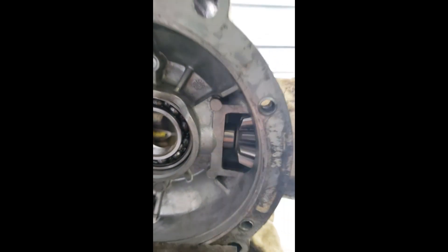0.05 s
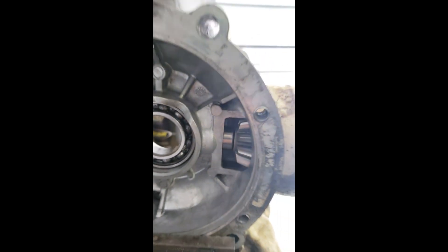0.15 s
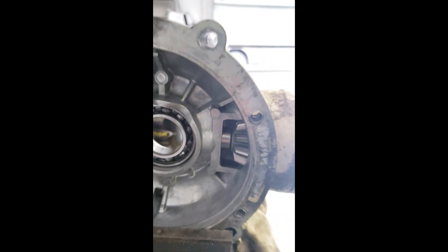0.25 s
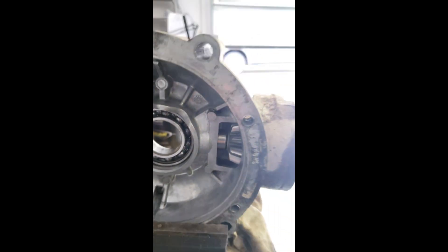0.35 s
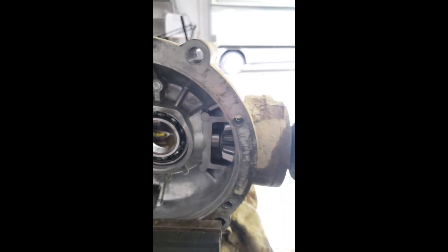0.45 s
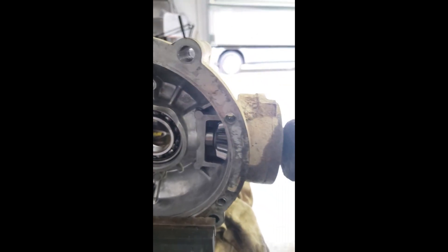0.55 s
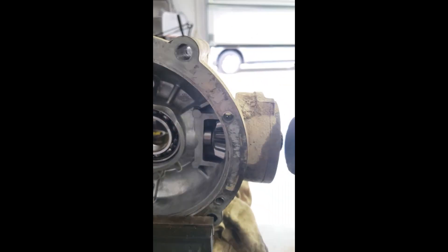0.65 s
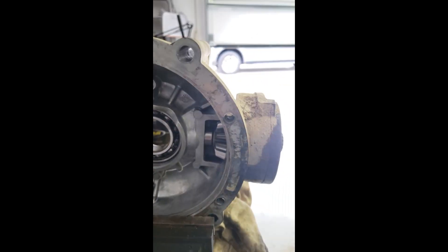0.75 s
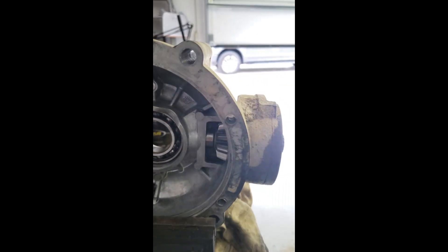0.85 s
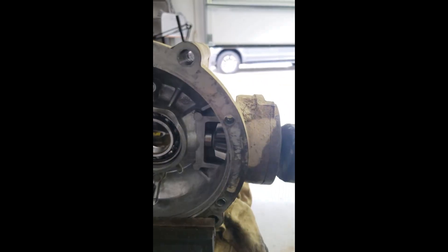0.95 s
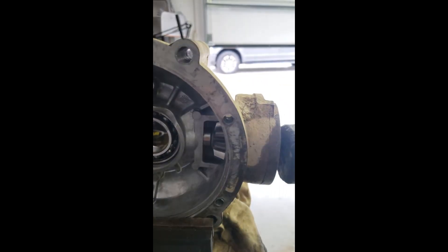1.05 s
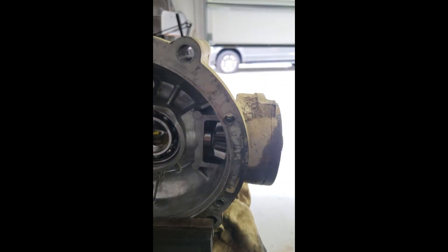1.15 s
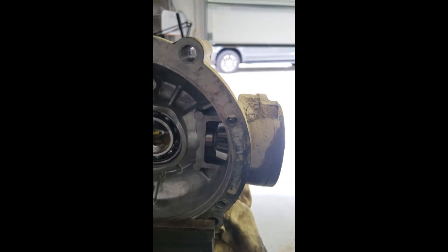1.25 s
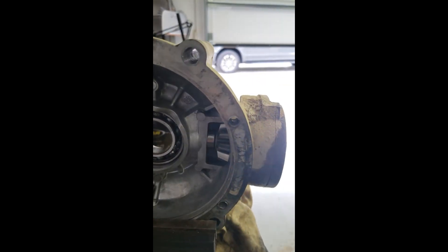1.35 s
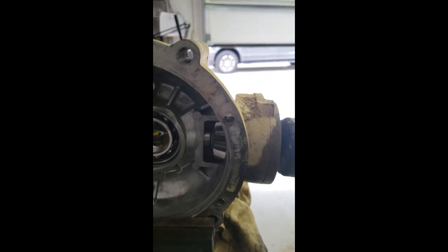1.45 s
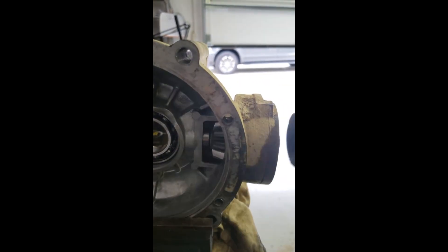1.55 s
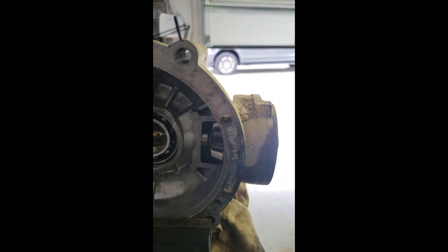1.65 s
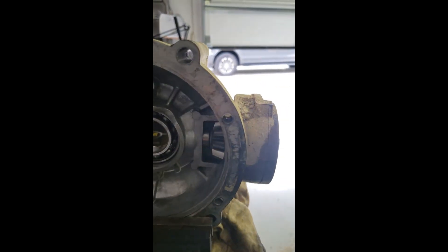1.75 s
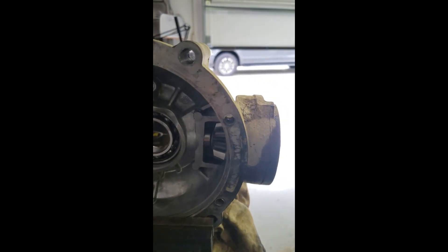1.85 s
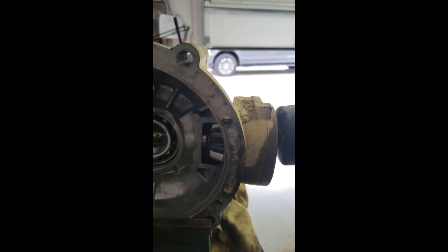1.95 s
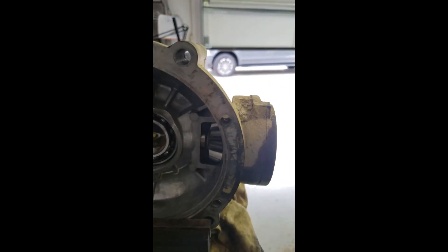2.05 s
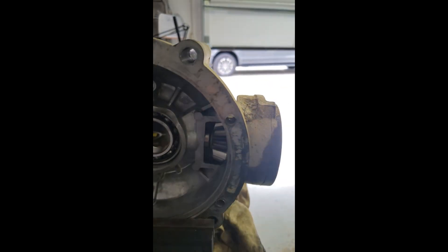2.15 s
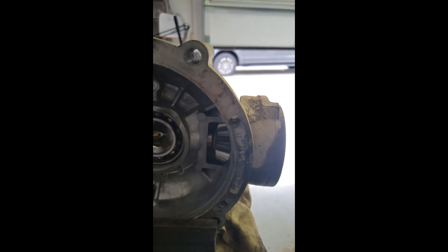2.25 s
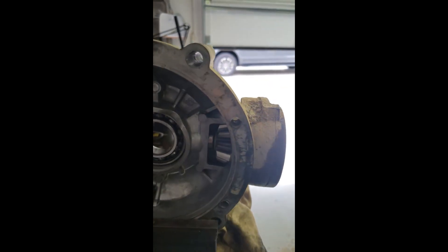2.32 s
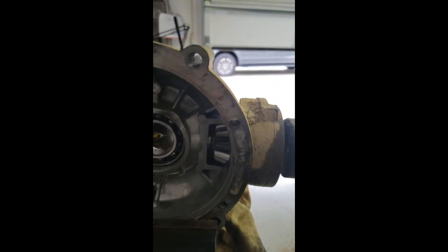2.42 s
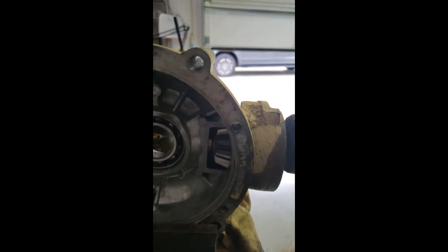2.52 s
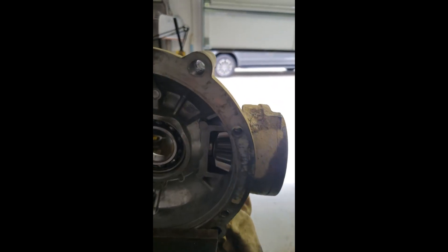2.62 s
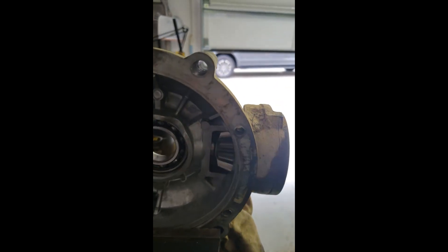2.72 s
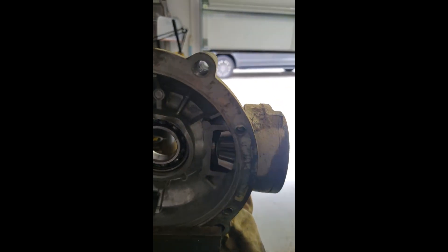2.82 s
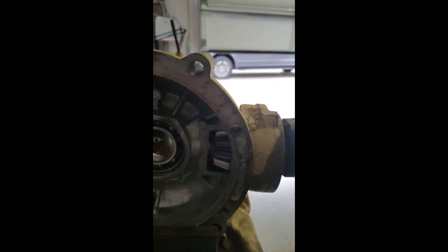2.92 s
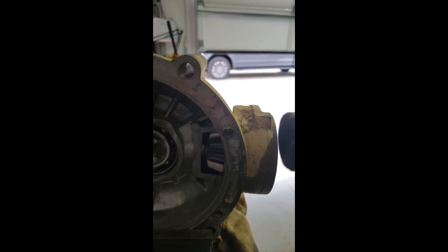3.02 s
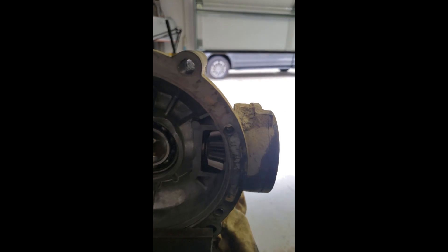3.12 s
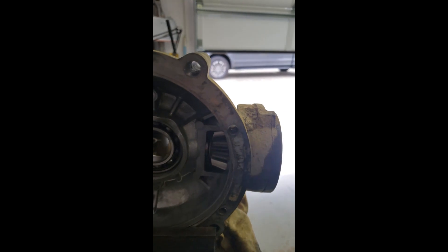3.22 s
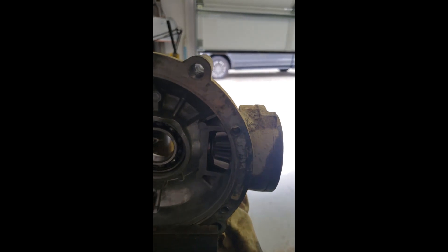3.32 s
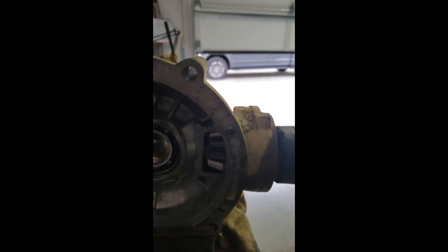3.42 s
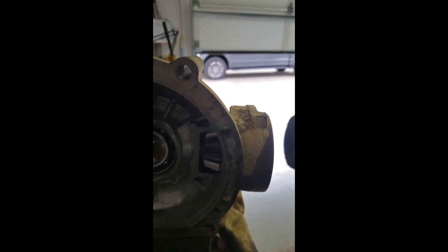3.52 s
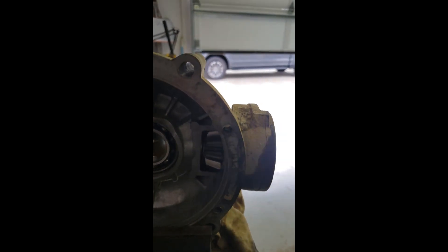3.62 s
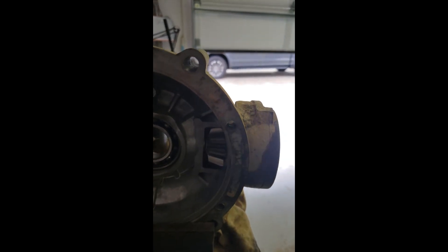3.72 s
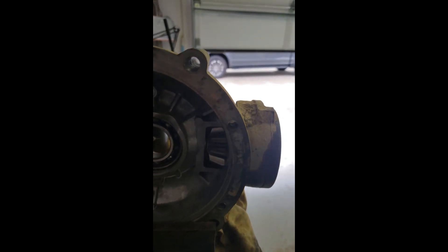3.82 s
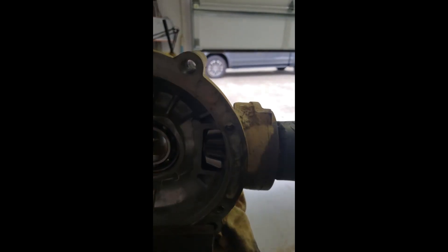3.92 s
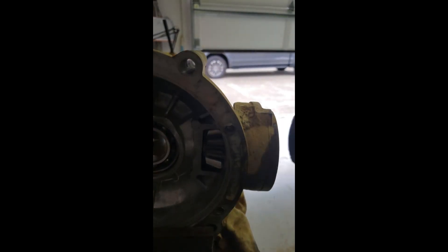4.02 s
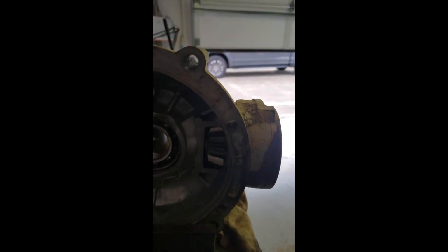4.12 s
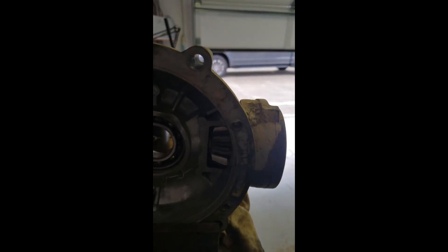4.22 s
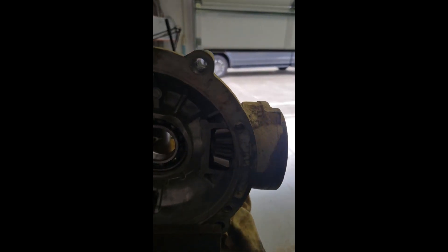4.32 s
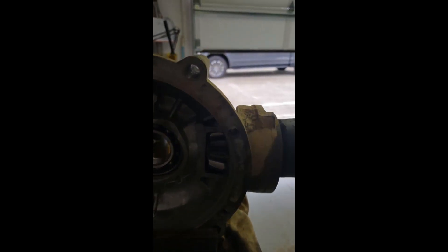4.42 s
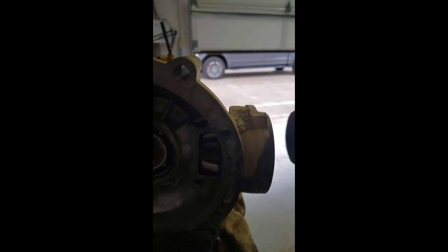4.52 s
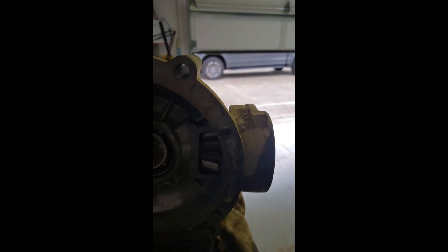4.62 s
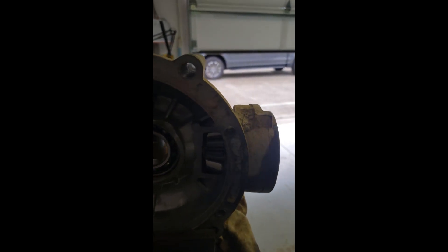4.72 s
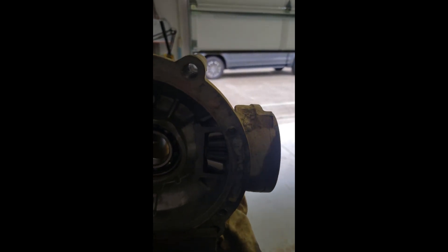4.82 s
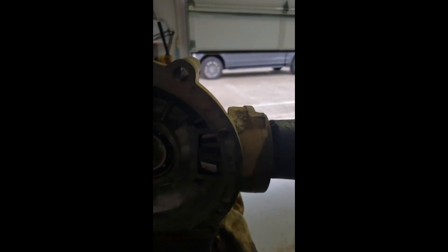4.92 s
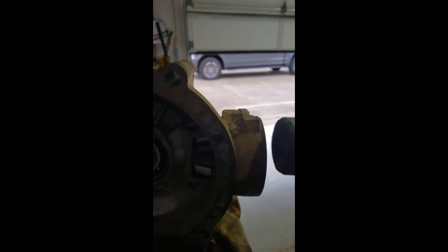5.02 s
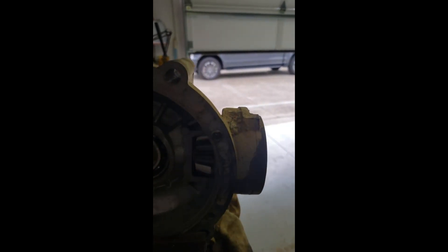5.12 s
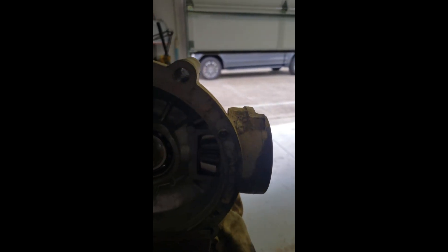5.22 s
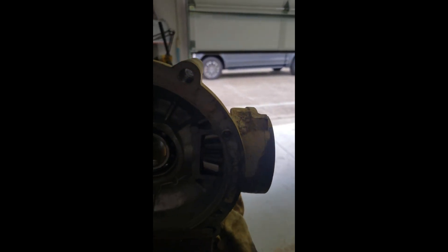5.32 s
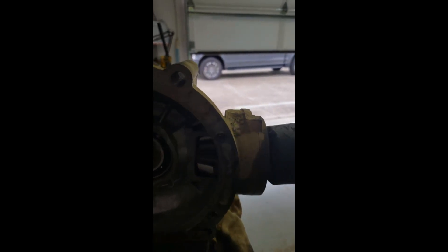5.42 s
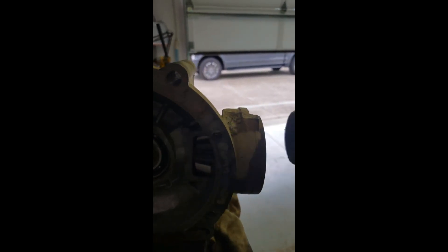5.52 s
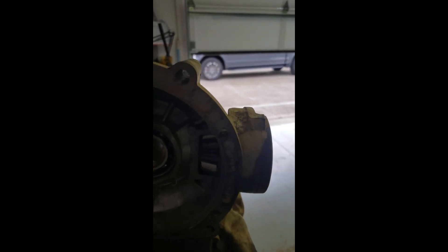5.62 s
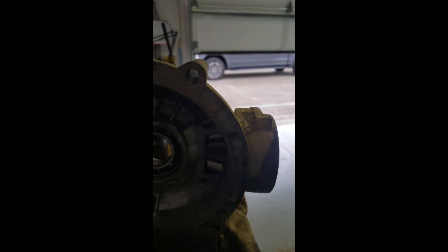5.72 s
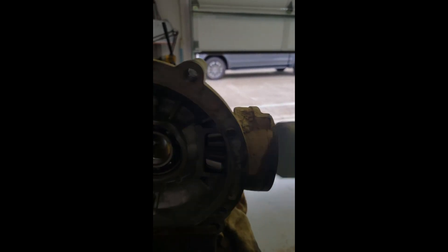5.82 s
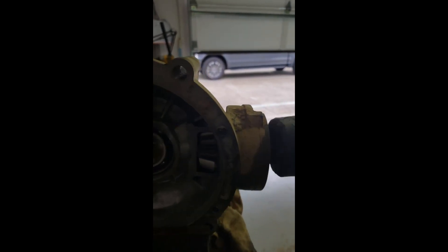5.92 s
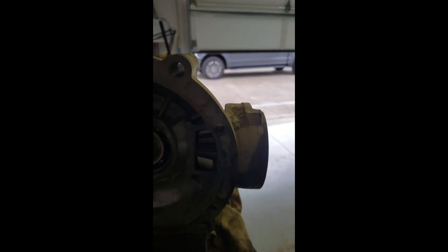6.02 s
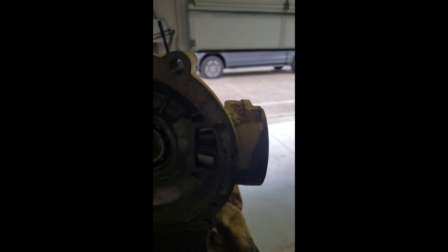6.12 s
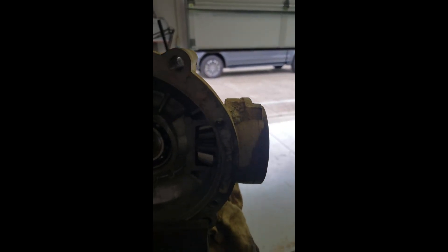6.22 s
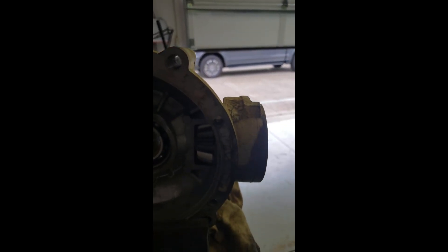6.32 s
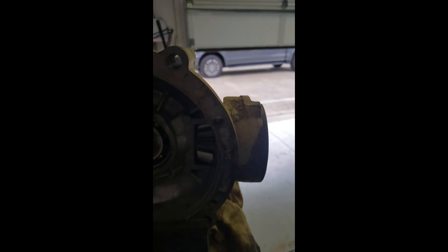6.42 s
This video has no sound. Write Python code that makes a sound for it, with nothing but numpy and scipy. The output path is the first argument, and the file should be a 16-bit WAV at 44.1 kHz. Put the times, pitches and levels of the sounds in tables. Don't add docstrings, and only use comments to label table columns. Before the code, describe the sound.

From 0 s a rubber mallet knocks a steel gear into a cast housing at arm's length, the first hit right at the start, then about every half second until 5.9 s, thirteen blows in all. Each has a blunt low thud, an instant hard steel clack around 2-5 kHz, a damped ring under a tenth of a second, and a little treble jingle. Up to 2 s the blows are more moderate; from 3.5 s they are strong and crack-heavy, the last the loudest. Quieter rebounds follow within 10-100 ms, clearest after 3 s, like a loose part bouncing and settling. A small shed echoes briefly. Wind rumbles softly, with bassy puffs near 0.9, 3.3 and 3.5 s. Very faint shop hum and hiss sink gradually; a distant thin whine swells near 1.2, 2.25 and 3.3 s. A tiny sagging squeak appears at 6.2 s.

```python
import sys
import numpy as np
from scipy import signal
from scipy.fft import rfft, irfft
from scipy.io import wavfile
from scipy.ndimage import uniform_filter1d

SR = 44100
rng = np.random.default_rng(int(sys.argv[2]) if len(sys.argv) > 2 else 0)


def waveform_to_disk(signal):
    frames = np.transpose(np.atleast_2d(signal))
    scaled = np.clip(frames, -1, 1) * 32767
    samples = np.round(scaled).astype(np.int16)
    wavfile.write(sys.argv[1], SR, samples)


def voltage_ratio(level):
    return 10 ** (np.asarray(level, float) / 20)


N = 284753
SPAN = 8192
TIME, STRIKE_TIME = np.arange(N) / SR, np.arange(SPAN) / SR
SIDES = np.array([[1], [-1]])


def shape(table, hz):
    f, v = np.transpose(table)
    return np.interp(np.log(hz + 1), np.log(f), v)


def tint(x, table):
    hz = np.fft.rfftfreq(x.shape[-1], 1 / SR)
    return irfft(rfft(x) * voltage_ratio(shape(table, hz)), x.shape[-1])


def unit(x):
    return x / np.sqrt(np.mean(x ** 2))


def tinted_noise(length, table):
    return unit(tint(rng.standard_normal((2, length)), table))


def fade(t, t60):
    return np.exp(-np.log(1000) * t / t60)


def walk(rate):
    k = int(SR / rate)
    held = np.repeat(rng.standard_normal((2, N // k + 1)), k, 1)
    return 1.2 * uniform_filter1d(uniform_filter1d(held, k), k)[:, :N]


def add(out, s, sound):
    i = max(int(s * SR), 0)
    out[:, i:i + SPAN] += sound[:, :N - i]


def blows():
    # (time [s], clack [dB], then against it: thud [dB], gear ring [dB], top [dB])
    mallet_blows = [(0.0004, -18, -11.5, -15, -55), (0.5066, -16.5, -7.5, -12.5, -19.5),
                    (1.0154, -21, -3.5, -8.5, -19.5), (1.5218, -15.5, -5, -10.5, -18),
                    (1.9968, -12.5, -7, -9, -15), (2.5116, -12, -9, -9.5, -16.5),
                    (2.9907, -13, -7.5, -3.5, -26), (3.4813, -9, -12, -12.5, -25),
                    (3.981, -9.5, -14, -15.5, -20.5), (4.4836, -12, -11.5, -12.5, -25.5),
                    (4.9918, -12, -12, -13.5, -22.5), (5.4719, -9.5, -14, -13.5, -18),
                    (5.9321, -7, -16.5, -14.5, -25)]
    # (time [s], clack [dB], weight over the usual [dB], gear ring over the usual [dB])
    rebounds = [(0.0107, -33.5, 12, 2), (0.047, -44.5, 16.5, 16), (0.5223, -31.5, 4, 15),
                (1.0564, -46, 12.5, 9), (1.5676, -36, 6, 2), (2.0493, -32, -2.5, -12),
                (2.0814, -53, 21.5, 24), (2.6043, -46, 8, 13.5), (2.9996, -16, -19, -15),
                (3.0413, -38.5, 2.5, -2.5), (3.0759, -46, 10.5, 12), (3.4908, -27, 2.5, -14),
                (3.5224, -28.5, -1.5, -4), (3.5813, -32.5, 4.5, 0), (3.985, -13, 1.2, -2),
                (4.024, -28, 2, 0), (4.0853, -29.5, -1.5, -5), (4.4914, -27.5, 5.5, -1),
                (4.5273, -35.5, 3, 5), (4.585, -30.5, -11, 0), (4.646, -52, 2.5, 8),
                (4.9986, -21, -3.5, 2.5), (5.0358, -26, -6, -4), (5.1024, -37.5, 1.5, -3),
                (5.4794, -31.5, -1.5, -1), (5.5145, -31.5, -5.5, -1), (5.5735, -40, 5, -12),
                (5.6214, -58.5, 1, 18.5), (5.9492, -15.5, 0, 8.5), (6.0476, -36, -5.5, -1)]
    # (time after the blow [s], thud [dB], 2.1 kHz ring [dB], 2.9 kHz ring [dB], top [dB])
    seating = [
        (.01, -11, -13, -11, -20),
        (.045, -1, -12.5, -10, -13.5),
        (0.101, -6.5, -16, -9, -22),
    ]
    tilt_db = 1
    out = np.zeros((4, N))
    for s, db, thud_db, ring_db, top_db in mallet_blows:
        blow = strike(db, thud_db, ring_db - tilt_db, ring_db + tilt_db, top_db,
                      push_s=0.00044, chatter_s=0.00081, grain_db=3.5, crack_db=0.1)
        add(out, s - .0006, blow)
    after, *usual = np.transpose(seating)
    for s, db, weight_db, ring_db in rebounds:
        late = s - max(blow[0] for blow in mallet_blows if blow[0] < s)
        thud_db, low_db, mid_db, top_db = (np.interp(late, after, c) for c in usual)
        rebound = strike(db, thud_db + weight_db - 9.5, low_db + ring_db, mid_db + 0.66 * weight_db, top_db - 3,
                         push_s=.0008, chatter_s=0.0022, grain_db=2.0, crack_db=-3.5)
        add(out, s - .0005, rebound)
    return out


def strike(db, thud_db, low_db, mid_db, top_db, push_s, chatter_s, grain_db, crack_db):
    # thud, low ring, mid ring, clack, top [Hz]
    column_hz = (1200, 2100, 2900, 5000, 12500)
    colour = list(zip(column_hz, (thud_db + 9.5, low_db + 6.5, mid_db + 6.5, 0, top_db + 18.0)))
    late = np.clip(STRIKE_TIME - .8 * push_s, 0, None)
    grain_levels = np.repeat(rng.uniform(-2, 2, SPAN // 32), 32)
    grains = voltage_ratio(grain_db * uniform_filter1d(grain_levels, 16))
    steel = steel_ring(late, grains, chatter_s, colour)
    broad = (voltage_ratio(crack_db) * crack(late, grains, chatter_s, colour)
             + bench_thud(push_s, thud_db)
             + voltage_ratio(top_db / 2 - 29.0) * jingle()
             + voltage_ratio(-17.0 + .5 * (low_db + mid_db + 24.5) / 2) * clatter())
    sound = np.vstack([broad + voltage_ratio(-8.5) * steel, broad + voltage_ratio(-22.5) * steel])
    return voltage_ratio(db) * sound * np.clip(8 - 8 * STRIKE_TIME / STRIKE_TIME[-1], 0, 1)


def ring(modes, detune, scatter_db, colour):
    hz, db, t60 = np.tile(np.transpose(modes), 2)[:, :, None]
    a, b, c = rng.standard_normal((3, 2 * len(modes), 1))
    size = voltage_ratio(db + shape(colour, hz) + scatter_db * b) * fade(STRIKE_TIME, t60 * np.exp(0.12 * c))
    return np.sum(size * np.sin(2 * np.pi * hz * (1 + detune * a) * STRIKE_TIME), axis=0)


def bench_thud(push_s, thud_db):
    # (frequency [Hz], level [dB], t60 [s])
    bench_modes = [(97, -9, 0.9), (156, -9.5, 0.42), (193, -11.5, 0.024), (245.5, -8, 0.27),
                   (286, -14.5, 0.12), (324, -3.5, 0.27), (503, -12, 0.021), (595.3, 2.5, 0.13),
                   (688, 1.5, .04), (803, -3, 0.15), (1133, -6.5, 0.018), (1290, -11, 0.022)]
    # (frequency [Hz], density [dB per Hz])
    rattle_colour = [(60, -32), (150, 3.5), (400, -4), (900, -5), (1600, -19), (3000, -38)]
    t = STRIKE_TIME
    push = -np.sin(np.pi * np.clip(t / push_s, 0, 1)) ** 2
    modes = ring(bench_modes, detune=.07, scatter_db=4, colour=[(100, 0.0031), (1500, 0.021)])
    bench = signal.fftconvolve(push / push.sum(), modes)[:SPAN]
    bench = bench * fade(t, .16)
    mid, side = tinted_noise(SPAN, rattle_colour) * (1 - fade(t, 0.0024)) * fade(t, .12)
    rattle = mid + 0.73 * side * SIDES
    thud = voltage_ratio(9.0) * push - voltage_ratio(-16.5) * bench + voltage_ratio(-8.5) * rattle
    lean = np.gradient(np.roll(thud.mean(0), 9)) * SIDES
    return (thud + voltage_ratio(-1.0) * lean) * voltage_ratio(thud_db + 5.5 + 1.0 * SIDES)


def steel_ring(late, grains, chatter_s, colour):
    # (frequency [Hz], level [dB], t60 [s])
    steel_modes = [(2070, -3.5, 0.02), (2100, -6, 0.11), (2178, -4, 0.094), (2918, 1, 0.051),
                   (3086, -4, 0.039), (3800, -17.5, 0.092), (4270, -13, 0.035), (4879, -1, .04),
                   (5055, -3.5, 0.043), (5720, -10.5, .035), (5780, -8, 0.053), (6800, -13.5, 0.036),
                   (7080, -21, .04), (7630, -19.5, 0.034), (7960, -24, 0.05), (8300, -27.5, 0.045),
                   (11600, -16, 0.06), (12800, -23, .05), (13330, -19, 0.06), (15300, -12.5, .04)]
    noise = rng.standard_normal((2, SPAN))
    chatter = noise * grains * late * np.exp(-2 * late / chatter_s)
    chatter /= np.sqrt(np.sum(chatter ** 2, 1, keepdims=True))
    clusters = uniform_filter1d(grains, size=90) ** 4 * (1 - fade(late, 0.0069)) * fade(STRIKE_TIME, 0.13)
    ticks = unit(noise[:, ::-1] * clusters) / np.sqrt(SPAN)
    modes = ring(steel_modes, detune=0.012, scatter_db=0.1, colour=colour)
    return signal.fftconvolve(chatter + voltage_ratio(-9) * ticks, modes[None])[:, :SPAN]


def crack(late, grains, chatter_s, colour):
    # (frequency [Hz], density [dB per Hz])
    crack_colour = [(600, -31), (1000, -4.5), (2100, -11.5), (3000, -8.5), (3700, -10.5), (5200, -10),
                    (7000, -15), (8600, -24.5), (9900, -39.5), (11300, -21.5), (15500, -19.5), (16500, -30)]
    swell = (1 - np.exp(-late / (0.47 * chatter_s))) * np.exp(-late / (4.23 * chatter_s))
    return tint(tinted_noise(SPAN, crack_colour), colour) * swell * grains


def clatter():
    # (frequency [Hz], density [dB per Hz])
    clatter_colour = [(500, -20), (1000, -4.5), (2100, 4), (3300, -6.5), (5500, -7.5), (7500, -15.5),
                      (9000, -22.5), (12000, -51.5)]
    t = STRIKE_TIME
    return tinted_noise(SPAN, clatter_colour) * (1 - fade(t, 0.0096)) * (fade(t, .07) + voltage_ratio(-8.5) * fade(t, 0.17))


def jingle():
    # (frequency [Hz], density [dB per Hz])
    jingle_colour = [(7000, -33.5), (8900, -5), (10000, -15.5), (11000, -8), (11500, 0.5), (12100, -4),
                     (13500, -4.5), (15700, -0.5), (16500, -22)]
    return tinted_noise(SPAN, jingle_colour) * (1 - fade(STRIKE_TIME, .01)) * fade(STRIKE_TIME, 0.21)


def shed(x):
    # (frequency [Hz], t60 [s])
    shed_t60 = [(100, 0.39), (260, 0.46), (700, 0.29), (1800, 0.35), (5000, 0.32), (8000, 0.33),
                (12000, 0.063)]
    # (frequency [Hz], level [dB])
    shed_colour = [(100, 2), (400, -1), (1500, -10), (3500, -6), (5000, -12), (8000, -12.5), (14000, 0.5)]
    panel_hz, panel_t60_s, panel_db = 820, 0.62, -17
    t = np.arange(4 * SPAN) / SR
    f = np.fft.rfftfreq(4 * SPAN, 1 / SR)

    def band(hz, octaves):
        spectrum = rfft(rng.standard_normal((2, len(t))))
        return irfft(spectrum * np.exp(-(np.log2(f / hz + 1e-9) / octaves) ** 2))

    echo = 0
    for hz in 60 * 2 ** np.arange(0, 8.6, .5):
        mid, side = band(hz, .3)
        pair = mid + np.clip(hz / 1100, .1, 1) * side * SIDES
        echo = echo + voltage_ratio(shape(shed_colour, hz)) * pair * fade(t, shape(shed_t60, hz))
    panel = band(panel_hz, 0.36) * fade(t, panel_t60_s)
    echo = (echo + voltage_ratio(panel_db) * panel) * np.clip(t / 0.019, 0, 1)
    source = x.mean(0, keepdims=True) + x / 2
    return voltage_ratio(-37.5) * signal.fftconvolve(source, echo, axes=1)[:, :N]


def breeze():
    # (time [s], level [dB])
    breeze_levels = [(0.0, -57.5), (0.83, -55), (0.97, -54), (2.01, -54.5), (2.17, -60.5), (2.53, -55),
                     (2.7, -63), (2.95, -64), (3.13, -58), (3.47, -47), (3.61, -56.5), (3.96, -56),
                     (4.23, -62.5), (5.5, -59.5), (5.63, -53.5), (6.0, -64.5), (6.46, -56.5)]
    # (frequency [Hz], density [dB per Hz])
    buffet_colour = [(12, -51.5), (20, -9), (59, 1), (86, 0), (130, -4.5), (161, -12), (273, -19.5),
                     (398, -31.5), (500, -35.5), (650, -64), (1100, -120)]
    # (time of the middle [s], level [dB], left minus right [dB], frequency [Hz])
    puffs = [(.4956, -40.5, 5, 81), (0.8986, -32, -5.5, 117), (1.288, -41, 0, 86), (1.422, -45, 0, 90),
             (1.86, -37.5, 0, 72), (3.278, -31.5, 0, 103), (3.46, -36, -0.5, 86.4),
             (3.786, -40.5, -3.5, 121), (4.768, -44.5, 1, 101), (4.93, -47, 0, 110), (5.425, -41.5, 3, 110),
             (5.735, -39, 10.5, 212), (5.795, -44, -2, 55), (5.858, -48.5, -6, 75), (6.188, -41, 5.5, 95),
             (6.412, -42.5, 9, 80)]
    gust_db, sway_db, left_db = 1.65, 2, 1.46
    puff_cycles = 0.58
    wind_db = np.interp(TIME, *np.transpose(breeze_levels)) + gust_db * walk(9)[0]
    sway = left_db + sway_db * walk(5.2)[0]
    lumps = walk(45)
    eddies = tinted_noise(N, buffet_colour)
    out = eddies * voltage_ratio(wind_db + 4.0 + sway * SIDES / 2 + 3.0 * lumps[0] + 1.6 * lumps)
    for s, db, pan_db, hz in puffs:
        cycles = hz * (TIME - s)
        thump = -np.sin(2 * np.pi * cycles) * np.exp(-(cycles / puff_cycles) ** 2)
        out = out + voltage_ratio(db + pan_db * SIDES / 2) * thump
    return out


def phone_gain():
    # (time [s], level [dB])
    gain = [(0, -72), (2.7, -76), (4.17, -80.5), (4.7, -87), (6.46, -89.5)]
    return np.interp(TIME, *np.transpose(gain))


def microphone_hiss(gain_db):
    # (frequency [Hz], density [dB per Hz])
    hiss_colour = [(1000, -34), (1700, -8.5), (2810, -7.5), (3890, 0), (5070, -3.5), (7210, -2.5),
                   (8980, -14.5), (13900, -8), (15100, -11), (16000, -20.5), (16500, -32)]
    return tinted_noise(N, hiss_colour) * voltage_ratio(gain_db + 7.0 + 0.38 * walk(1.7))


def shop_hum(gain_db):
    # (frequency [Hz], density [dB per Hz])
    hum_colour = [(120, -25), (200, -10), (456, -17.5), (633, -8.5), (966, -17.5), (1550, -17),
                  (1940, -23.5), (2500, -24.5), (3250, -52.5), (5500, -120)]
    hum_db, gain_share = -75, .4
    mid, side = tinted_noise(N, hum_colour)
    return (mid + .7 * side * SIDES) * voltage_ratio(hum_db + gain_share * (gain_db - gain_db[0]) + 2.2 * walk(8.2))


def machine_whine(gain_db):
    # (time [s], rise [dB])
    swells = [
        (1.2, 15.5),
        (2.251, 17.5),
        (3.3, 16),
    ]
    whine_hz, whine_db, swell_s = 1530, -11, .2
    turn = 2 * np.pi * np.cumsum(whine_hz + 6 * walk(30)[0]) / SR
    load_db = sum(db * np.exp(-((TIME - s) / swell_s) ** 2) for s, db in swells)
    level_db = gain_db + whine_db + load_db + 0.83 * walk(6.2)
    return np.sin(turn + np.array([[0], [2.2]])) * voltage_ratio(level_db)


def squeak():
    start_s, rise_s, t60_s, level_db = 6.235, 0.033, 0.37, -74.5
    squeak_hz, sag_hz, lowest_s = 1570, 180, .1
    late = np.clip(TIME - start_s, 0, None)
    sag = late / lowest_s * np.exp(1 - late / lowest_s)
    turn = 2 * np.pi * np.cumsum(squeak_hz - sag_hz * sag + 25 * walk(120)[0]) / SR
    swell = np.clip(late / rise_s, 0, 1) ** 2 * fade(late, t60_s)
    return np.sin(turn) * swell * voltage_ratio(level_db + 3 * walk(71))


def background():
    gain_db = phone_gain()
    return microphone_hiss(gain_db) + shop_hum(gain_db) + machine_whine(gain_db) + squeak()


def scene():
    near, far = np.split(blows(), 2)
    bass_cut = signal.butter(2, 95, "high", fs=SR, output="sos")
    heard = signal.sosfilt(bass_cut, near + shed(far))
    return heard + breeze() + background()


def roll_off(x):
    return signal.sosfilt(signal.butter(12, 16990, fs=SR, output="sos"), x)


def record(dry):
    top_cut = signal.ellip(8, .5, 40, 15950, fs=SR, output="sos")
    mix = signal.sosfilt(top_cut, np.tanh(dry))
    return roll_off(mix)


dry = scene()
out = record(dry)
waveform_to_disk(out)
```